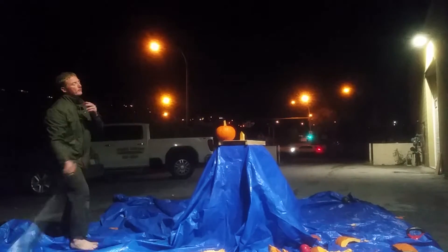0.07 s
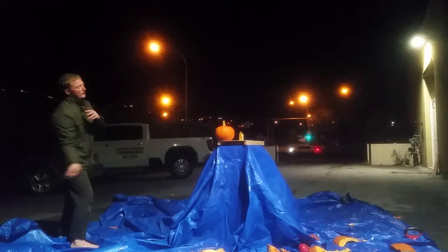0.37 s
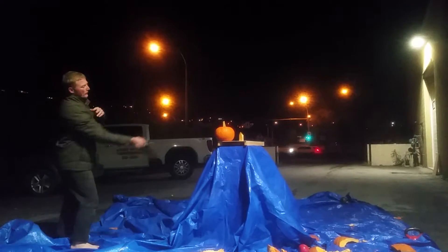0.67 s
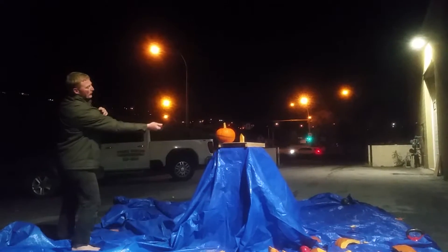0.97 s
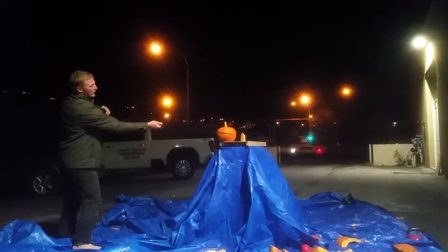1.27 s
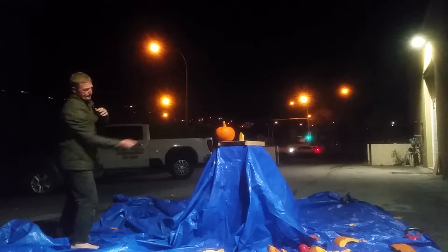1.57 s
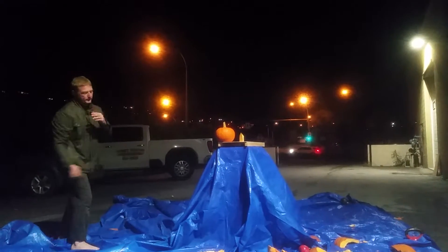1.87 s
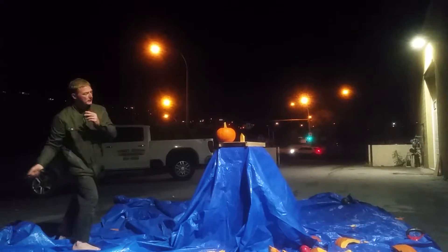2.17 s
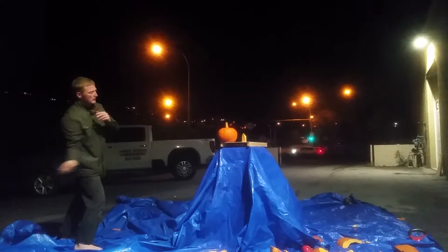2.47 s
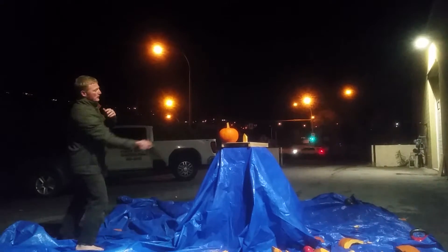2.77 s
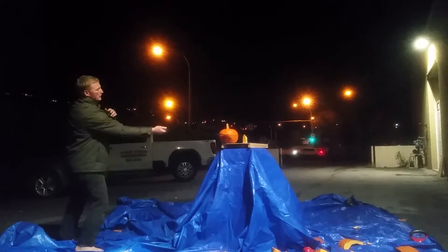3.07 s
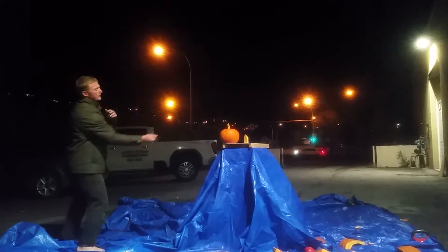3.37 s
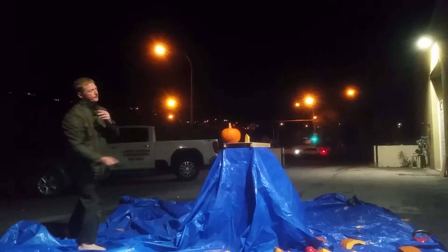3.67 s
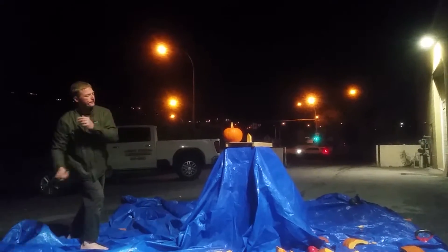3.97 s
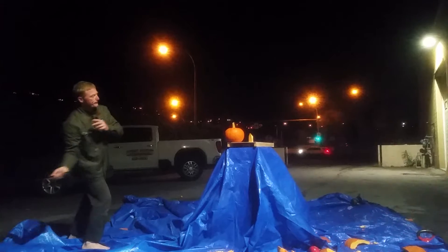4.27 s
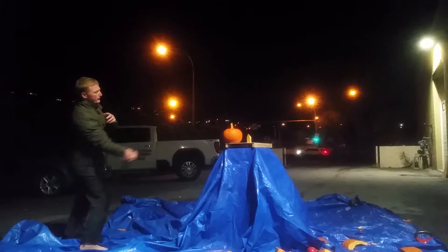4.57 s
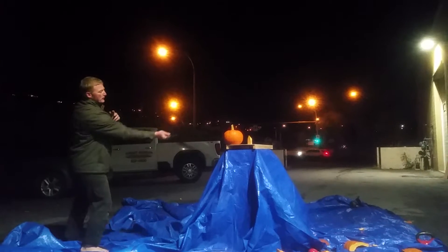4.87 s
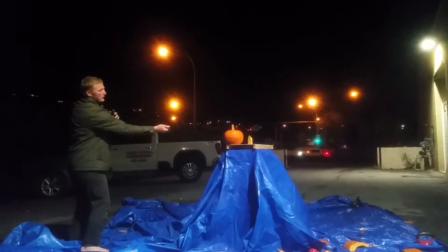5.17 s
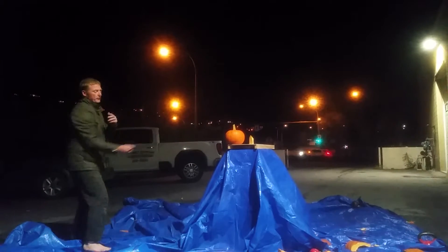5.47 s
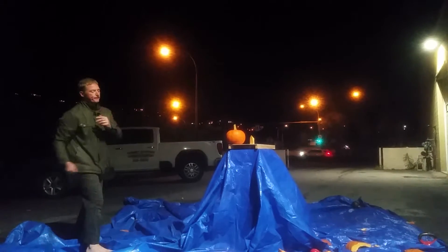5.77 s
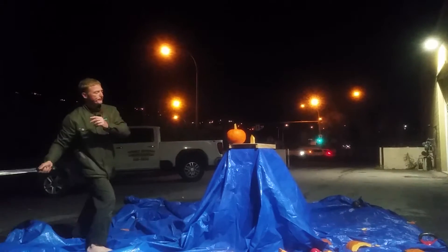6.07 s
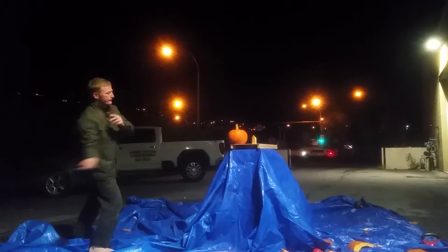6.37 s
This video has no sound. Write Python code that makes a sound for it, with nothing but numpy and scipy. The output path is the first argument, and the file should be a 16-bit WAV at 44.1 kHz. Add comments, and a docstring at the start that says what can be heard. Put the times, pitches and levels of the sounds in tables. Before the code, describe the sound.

A hand-held microphone in an open parking lot picks up a continuous low road rumble, a little to the right. Close cloth rustling comes first, then soft handling thuds and later one sharp little click with a hollow knock. Meanwhile a vehicle draws near with a falling boom, two stretches of engine drone and swelling tyre noise. Light jacket rustles and ticks return near the end, when the vehicle is nearest.

```python
"""A parking lot beside a road at night. At first far traffic rumbles and exhaust notes drone, while a
jacket rustles and ticks close to the faintly hissing, hand-held microphone. After a second the grip
bumps the housing. From 2.4 seconds a hollow boom sinks in pitch as a vehicle draws near, and just
after 3 seconds a small hard part clicks against the housing. Then a near engine pulls twice and the
tyre roar grows. The jacket rustles again from 5 seconds, and the vehicle is closest at about 6."""
import sys
import numpy as np
from scipy import signal
from scipy.fft import rfft, irfft, next_fast_len
from scipy.io import wavfile

SR = 44100
rng = np.random.default_rng(int(sys.argv[2]) if len(sys.argv) > 2 else 0)


def unload_audio(sound):
    """Save the sound as a 16-bit wav file, at the path given as the first command line argument."""
    columns = np.transpose(np.atleast_2d(sound))
    # keep every value between -1 and 1, then stretch to whole-number steps
    steps = np.round(np.clip(columns, -1, 1) * 32767)
    wavfile.write(sys.argv[1], SR, steps.astype(np.int16))


N = 282681
TIME = np.arange(N) / SR
PADDED = next_fast_len(N + SR // 4)   # spare room for filters to ring out
HZ = np.maximum(np.fft.rfftfreq(PADDED, 1 / SR), 1)
# The vehicle on its straight road: when it is closest, how far off it is then, and its speed.
CLOSEST_S, DISTANCE_M, SPEED_M_PER_S = 5.95, 16, 13.23

# The tone colour of each noise. Each row: frequency in Hz, relative strength in dB.
ROAD_COLOUR = [(20, -7), (32, 7), (70, 7), (110, 7), (210, -1.5), (300, -6), (400, -8.5), (560, -15),
               (800, -15), (1200, -25), (1600, -31), (2100, -37.5), (3800, -48), (6000, -73.5)]
HISS_COLOUR = [(1500, 0), (3500, 7), (5200, -4.5), (7000, -12), (8700, -10), (9900, -1.5), (12000, -1.5),
               (15700, 0.5)]
CLOTH_BODY_COLOUR = [(150, -4.5), (240, -3), (340, 0), (420, 0), (550, 4.5), (640, -5.5), (820, -2.5),
                     (1180, -10), (1450, -23.5)]
CLOTH_RUB_COLOUR = [(1200, -8), (2200, -4.5), (3000, 0), (3750, 1.5), (4600, -11), (6200, -31.5),
                    (7500, -36.5)]
SOFT_FOLD_COLOUR = [(7000, -36.5), (8300, -23.5), (9300, -4.5), (10000, 3.5), (10700, -1.5), (11800, -9),
                    (13400, -13.5), (15700, -16)]
STIFF_FOLD_COLOUR = [(8500, -30), (10000, -16), (12000, -3), (13500, -1), (15700, 0.5)]
# How alike the road sounds on both sides. Each row: frequency in Hz, likeness from 0 to 1.
ROAD_LIKENESS = [(30, 0.98), (120, 1), (300, 0.94), (600, 0.77), (1200, 0.19), (3000, 0.73), (8000, .1)]
# How the road leans to the right. Each row: frequency in Hz, left minus right in dB.
ROAD_LEAN = [(30, -6), (120, -5.5), (330, -6.5), (600, -6.5), (1500, -3.5), (2500, -1.5), (5000, -5.5)]
# The road's rumble, roar, tread noise and hiss. Each row: steady far traffic in dB,
# the vehicle at its closest in dB, dB lost for each dB of distance.
ROAD_BANDS = [(-52, -48, 1.27), (-62.5, -45.5, 1.32), (-74, -52.5, 1.92), (-89, -66.5, 3)]
# Exhaust notes. Each row: time in seconds, pitch in Hz, level in dB before the engine's gain.
FAR_ENGINE = [(0.0, 139.3, -60), (0.126, 141.6, -48), (0.332, 139.8, -55), (0.796, 139.2, -55),
              (1.052, 139, -46.5), (1.11, 144.2, -65), (1.214, 140.2, -50), (1.46, 138.4, -59)]
FAR_WHINE = [(0.3, 287.0, -59.5), (0.63, 295.9, -60.5), (0.92, 289.1, -57), (1.11, 295.2, -73.5),
             (1.34, 279.1, -58), (1.63, 291.3, -59), (1.82, 278.5, -55), (2.8, 285.6, -59)]
SECOND_ENGINE = [(1.68, 128.3, -53.5), (1.788, 122.6, -43.5), (1.902, 121.6, -53), (2.038, 123.7, -50),
                 (2.314, 119.2, -55), (2.56, 127.1, -43.5), (2.834, 126.5, -52.5), (2.978, 122, -45.5),
                 (3.08, 113.7, -59)]
NEAR_ENGINE_PULLS = [
    [(3.55, 128.5, -45), (3.662, 129.6, -50.5), (3.754, 129.8, -42.5), (3.774, 129.8, -49),
     (4.132, 130.1, -39), (4.162, 130.6, -47), (4.296, 131.2, -38.5), (4.774, 131.3, -36),
     (5.11, 131.1, -40)],
    [(5.3, 131.0, -42), (5.368, 131.2, -51), (5.386, 131.1, -43.5), (5.966, 132.4, -41),
     (5.974, 132.8, -52), (6.044, 132.9, -38), (6.334, 130, -36.5), (6.36, 130.1, -52), (6.41, 129.7, -40)],
]   # two such lists, one for each pull
# The tones that make up an exhaust note. Each row: multiple of the pitch, relative level in dB.
FAR_PARTIALS = [(.6, -3), (1, 1.5), (1.202, -6)]
NEAR_PARTIALS = [(.25, -18), (.5, -18.5), (1, 0.5), (1.25, -16), (2, -21.5)]
# The microphone's hiss. Each row: time in seconds, level in dB.
HISS_LEVELS = [(0.9, -83.5), (1.32, -84), (1.72, -82), (4.9, -77)]
# Strokes of the jacket's cloth. Each row: peak time, rise time and time to fade by 60 dB (t60),
# all in seconds, then body, rub and sheen levels in dB, then stiffness from 0 to 1.
CLOTH_STROKES = [(.15, .14, 1.1, -45.5, -60, -63.5, .1), (.215, 0.09, 0.51, -61, -59.5, -65, 0.1),
                 (.35, 0.017, .55, -52, -62, -71, 0.1), (5.22, 0.14, 1.3, -79.5, -92.5, -72.5, .2),
                 (5.384, .007, .5, -64.5, -78, -58.5, .05), (5.48, 0.046, 1.4, -71.5, -79.5, -67, 0.2),
                 (5.73, 0.085, 1.7, -72, -81.5, -69, 0.1), (6.02, 0.2, 2.25, -74, -87.5, -69, 0)]
# Folds snapping over. Each row: start in seconds, peak in dB before gain, stiffness from 0 to 1.
FOLD_SNAPS = [(.205, -50, 0.7), (.225, -41.5, .4), (0.271, -45.5, 0), (1.634, -72, 0.2), (2.1645, -66, 0.8),
              (3.8904, -68.5, 0.48), (4.2795, -69.5, 0.01), (4.994, -61.5, 0.29), (5.283, -62, 0.7),
              (5.377, -46, .2), (5.443, -42, 1), (5.511, -52, 0.46), (5.743, -54, 0.02),
              (5.9638, -52, 0.15)]
# Bumps of the grip. Each row: start in seconds, thud level in dB, pitch in Hz, scuff level in dB.
GRIP_BUMPS = [(1.178, -44, 336.5, -53), (1.209, -43, 190, -51.5), (1.488, -28.5, 68.7, -48.5),
              (1.509, -37.5, 85, -37), (1.531, -35.5, 49.4, -53), (1.597, -36, 61, -40.5),
              (1.607, -29, 70.3, -57)]
# The vehicle's hollow boom and singing tyres. Each row: time in seconds, pitch in Hz, level in dB.
BOOM_GLIDE = [(2.4, 215, -55.5), (2.9, 200, -56), (3.4, 169.7, -46.5), (4.1, 160.2, -47),
              (4.5, 139.6, -50.5), (4.85, 110.1, -47), (5.25, 96.65, -47.5), (5.7, 70, -50.5),
              (6.41, 61.67, -48)]
TYRE_SONG = [(3.2, 834, -75.5), (3.6, 868.5, -58.5), (3.9, 893, -58), (4.3, 876, -69.5), (4.8, 842.4, -53),
             (5.2, 866, -48.5), (5.6, 840, -65.5), (6.41, 808, -52.5)]
# How the click and the knock ring. Each row: pitch in Hz, level in dB before filtering, t60 in seconds.
CLICK_MODES = [(10500, -73, .09), (11501, -72, .08), (12200, -69, .10), (12993, -67, .11),
               (13580, -67, .08), (13863, -66, .09)]
KNOCK_MODES = [(372.5, -37.5, 0.19), (580, -40, 0.043), (684, -52, .05)]
# The tyres' hum, drone and whirr. Each row: pitch in Hz, width in Hz, level at the closest in dB,
# dB lost for each dB of distance.
TYRE_TONES = [(481.2, 33, -55, 1.8), (643, 60, -55, 4), (1795, 230, -64.5, 4)]


def from_db(db):
    """Turn decibels into a gain to multiply by."""
    return 10 ** (np.asarray(db) / 20)


def unit_power(x):
    """Scale a signal so that its average power is one."""
    return x / np.sqrt(np.mean(x ** 2) + 1e-20)


def in_time(rows):
    """Join a table's rows with straight lines, giving each column a value at every sample."""
    times, *columns = np.transpose(rows)
    return [np.interp(TIME, times, column) for column in columns]


def during(rows, fade_s=0.043):
    """A gain of one from a table's first time to its last, fading to zero outside."""
    start, end = rows[0][0], rows[-1][0]
    return np.interp(TIME, [start - fade_s, start, end, end + fade_s], [0, 1, 1, 0])


def at_hz(points):
    """Read a table at every frequency, with octaves evenly spaced."""
    hz, value = np.transpose(points)
    return np.interp(np.log(HZ), np.log(hz), value)


def colour(x, spectrum):
    """Give a sound a tone colour that falls away steeply past the ends of its table."""
    low_hz, high_hz = spectrum[0][0], spectrum[-1][0]
    ends = 1 / np.sqrt((1 + (.8 * low_hz / HZ) ** 12) * (1 + (.8 * HZ / high_hz) ** 12))
    return irfft(rfft(x, PADDED) * from_db(at_hz(spectrum)) * ends, PADDED)[..., :N]


def pan(lean_db):
    """Left and right gains that average one; a positive lean is to the left."""
    gains = from_db(np.array([[lean_db], [-lean_db]]) / 2)
    return gains / gains.mean()


def drift(rate_hz):
    """A random wobble, mostly slower than the given rate."""
    spectrum = rfft(rng.standard_normal(PADDED)) / (1 + (HZ / rate_hz) ** 2)
    return unit_power(irfft(spectrum, PADDED)[:N])


def distance_db():
    """How much farther off the vehicle is than at its closest."""
    return 20 * np.log10(np.hypot(1, SPEED_M_PER_S * (TIME - CLOSEST_S) / DISTANCE_M))


def road(right_lag_ms=0.43):
    """Far traffic plus the passing vehicle, whose treble grows most as it comes near."""
    shared, separate = rfft(rng.standard_normal(PADDED)), rfft(rng.standard_normal((2, PADDED)))
    alike = np.clip(at_hz(ROAD_LIKENESS), 0, 1)
    delay = np.exp(-2j * np.pi * HZ * np.array([[0], [right_lag_ms / 1000]]))
    noise = np.sqrt(alike) * shared * delay + np.sqrt(1 - alike) * separate
    noise *= from_db(at_hz(ROAD_COLOUR) + at_hz(ROAD_LEAN) * [[.5], [-.5]])
    below_edge = [0] + [1 / (1 + (HZ / edge_hz) ** 10) for edge_hz in (200, 620, 1300)] + [1]
    leaving = 11.5 * np.exp(-TIME / 0.42)   # earlier traffic dies away, most of all in the treble
    out = 0
    for k, (far_db, closest_db, falloff) in enumerate(ROAD_BANDS):
        band_gain = np.sqrt(np.maximum(below_edge[k + 1] - below_edge[k], 0))
        band = irfft(noise * band_gain, PADDED)[:, :N]
        traffic = from_db(far_db + (falloff - 1) * leaving)
        vehicle = from_db(closest_db - falloff * distance_db())
        out = out + np.hypot(traffic, vehicle) * band / band.mean(axis=0).std()
    return out


def from_the_road(x, right_lag_ms=0.41, lean_db=-4.0):
    """Sound from the road reaches the left side first, but is louder on the right."""
    delayed = np.interp(TIME - right_lag_ms / 1000, TIME, x)
    return np.array([x, delayed]) * pan(lean_db)


def engine(track, partials, gain_db, flutter):
    """An exhaust note made of pure tones, each fluttering on its way across the lot."""
    hz, level_db = in_time(track)
    phase = 2 * np.pi * np.cumsum(hz) / SR
    note = 0
    for multiple, db in partials:
        tone = from_db(db) * np.sin(multiple * phase + rng.uniform(0, 2 * np.pi))
        note = note + tone * (1 + flutter * drift(rate_hz=11))
    return np.sqrt(2) * note * from_db(level_db + gain_db) * during(track)


def microphone_hiss():
    """The microphone's own faint, high noise."""
    noise = unit_power(colour(rng.standard_normal((2, N)), HISS_COLOUR))
    return noise * from_db(in_time(HISS_LEVELS)[0])


def burst(start, t60):
    """A level that jumps up, then fades by 60 dB in t60 seconds."""
    return (TIME >= start) * from_db(-np.clip(60 * (TIME - start) / t60, 0, 200))


def swell(peak_s, rise_s, t60):
    """A stroke gathers speed smoothly, then dies away."""
    rise = np.exp(-np.minimum(((TIME - peak_s) / rise_s) ** 2, 20))
    return np.where(TIME < peak_s, rise, burst(peak_s, t60))


def friction(force, spectrum, slips_per_s, spread_db):
    """Tiny random slips over an equally strong smooth rub; more force makes both louder."""
    slips = rng.random(N) < slips_per_s / SR
    sizes = from_db(spread_db * np.minimum(rng.exponential(1, N), 3))
    grains = unit_power(slips * sizes * rng.standard_normal((2, N))) + rng.standard_normal((2, N))
    return colour(force * grains, spectrum) / colour(grains[0], spectrum).std()


def jacket_rustle():
    """Sliding cloth gives a dull body, a rub and a thin sheen that is higher on stiff folds."""
    power = 0
    for peak_s, rise_s, t60, body_db, rub_db, sheen_db, stiffness in CLOTH_STROKES:
        parts = from_db([body_db, rub_db, sheen_db, sheen_db]) ** 2 * [1, 1, 1 - stiffness, stiffness]
        power = power + np.outer(parts, swell(peak_s, rise_s, t60) ** 2)
    body_force, rub_force, soft_force, stiff_force = np.sqrt(power)
    sheen = friction(soft_force, SOFT_FOLD_COLOUR, slips_per_s=1200, spread_db=0.5)
    sheen += friction(stiff_force, STIFF_FOLD_COLOUR, slips_per_s=1700, spread_db=2.5)
    body = friction(body_force, CLOTH_BODY_COLOUR, slips_per_s=3100, spread_db=4.5)
    rub = friction(rub_force, CLOTH_RUB_COLOUR, slips_per_s=1800, spread_db=3.0)
    return body * pan(-9.0) + rub * pan(-4.5) + sheen * pan(11.5)


def fold_snaps(gain_db=-8.0, t60=.025, scrape_db=-20):
    """Single folds flip over with a tick; stiff ones sound higher, soft ones also scrape."""
    soft_force, stiff_force = 0, 0
    for start, db, stiffness in FOLD_SNAPS:
        force = from_db(db + gain_db) * burst(start, t60)
        soft_force += force * np.sqrt(1 - stiffness)
        stiff_force += force * np.sqrt(stiffness)
    ticks = friction(soft_force, SOFT_FOLD_COLOUR, slips_per_s=4000, spread_db=-0.5)
    ticks += friction(stiff_force, STIFF_FOLD_COLOUR, slips_per_s=4000, spread_db=3.0)
    scrape = friction(soft_force * from_db(scrape_db), CLOTH_RUB_COLOUR, slips_per_s=4000, spread_db=0.5)
    return ticks * pan(16.0) + scrape


def ring(start, hz, level_db, t60):
    """One fading tone of something struck."""
    age = np.maximum(TIME - start, 0)
    return from_db(level_db - np.minimum(60 * age / t60, 200)) * np.sin(2 * np.pi * hz * age)


def soften(x, cut_hz):
    """Take off the treble, as a padded contact does."""
    return signal.sosfilt(signal.butter(3, cut_hz, fs=SR, output="sos"), x)


def grip_bumps(thud_t60=0.074, scuff_t60=0.07):
    """The hand makes dull thuds with short scuffs, close to the microphone's right opening."""
    thuds = sum(ring(start, hz, db, thud_t60) for start, db, hz, _ in GRIP_BUMPS)
    force = sum(from_db(scuff_db) * burst(start, scuff_t60) for start, _, _, scuff_db in GRIP_BUMPS)
    scuff_colour = [(30, 9), (300, -0.5), (700, -18), (1700, -40), (2400, -49)]
    scuff = friction(force, scuff_colour, slips_per_s=1800, spread_db=0)
    return (scuff + soften(thuds, cut_hz=900)) * pan(-16.0)


def narrow_noise(hz, level_db, width_hz):
    """A narrow band of noise around a steady or gliding pitch."""
    phase = 2 * np.pi * np.cumsum(hz * np.ones(N)) / SR
    return (drift(width_hz) * np.cos(phase) + drift(width_hz) * np.sin(phase)) * from_db(level_db)


def hollow_boom():
    """A low band of noise sinks in pitch as the vehicle closes in."""
    return narrow_noise(*in_time(BOOM_GLIDE), width_hz=20) * during(BOOM_GLIDE, fade_s=0.12)


def housing_click(click_s=3.163, knock_s=3.167):
    """A small hard part hits the housing: a crack, thin ringing, a hollow knock, then cloth settling."""
    crack_force = from_db(-65) * burst(click_s, t60=0.05)
    crack_colour = [(8000, -27), (9200, -8), (11000, 1), (13000, -3.5), (15700, -4)]
    crack = friction(crack_force, crack_colour, slips_per_s=5000, spread_db=2.0)
    cloth_force = from_db(-74) * burst(click_s, t60=0.44)
    cloth_colour = [(8200, -31), (9000, -3), (10000, 2.5), (11500, -5), (14000, -4), (15700, -19)]
    cloth = friction(cloth_force, cloth_colour, slips_per_s=2600, spread_db=-1.0)
    ringing = colour(sum(ring(click_s, *mode) for mode in CLICK_MODES), [(10000, 0), (15700, 0)])
    knock = soften(sum(ring(knock_s, *mode) for mode in KNOCK_MODES), cut_hz=590)
    return (crack + ringing + cloth) * pan(14.0) + knock * pan(-6.5)


def tyres():
    """The tyres sing from afar; their hum and whirr grow as they come near."""
    hum = sum(narrow_noise(hz, db - falloff * distance_db(), width_hz)
              for hz, width_hz, db, falloff in TYRE_TONES)
    song = narrow_noise(*in_time(TYRE_SONG), width_hz=65) * during(TYRE_SONG, fade_s=0.12)
    return hum + song


def scene():
    """Add up the traffic, the hiss and the close sounds of jacket and hand."""
    engines = engine(FAR_ENGINE, FAR_PARTIALS, gain_db=-4.0, flutter=0.46)
    engines += engine(FAR_WHINE, [(1, 0)], gain_db=-3.0, flutter=0.14)
    engines += engine(SECOND_ENGINE, [(1, 0)], gain_db=0.5, flutter=0.35)
    for pull in NEAR_ENGINE_PULLS:
        engines += engine(pull, NEAR_PARTIALS, gain_db=-0.93, flutter=0.14)
    vehicles = from_the_road(engines + tyres() + hollow_boom())
    background = vehicles + microphone_hiss() + road()
    return background + jacket_rustle() + fold_snaps() + grip_bumps() + housing_click()


def record(dry, cutoff_hz=15750):
    """Cut off the very highest treble steeply."""
    return signal.sosfilt(signal.ellip(12, .1, 80, cutoff_hz, fs=SR, output="sos"), dry)


dry = scene()
out = record(dry)
unload_audio(out)
```